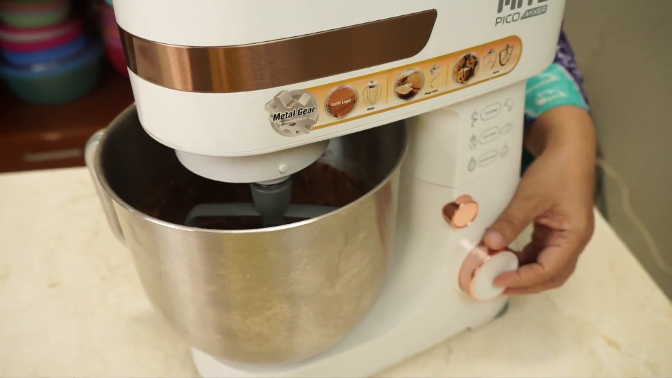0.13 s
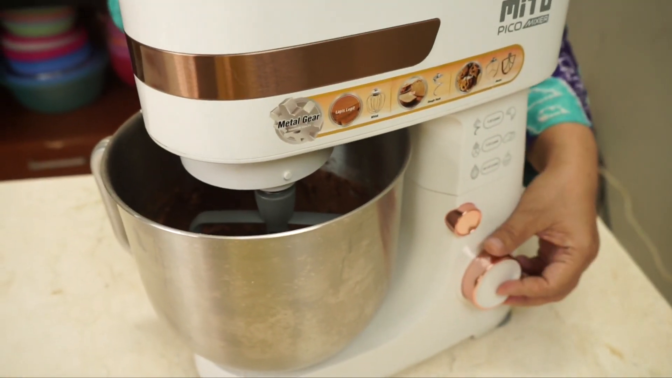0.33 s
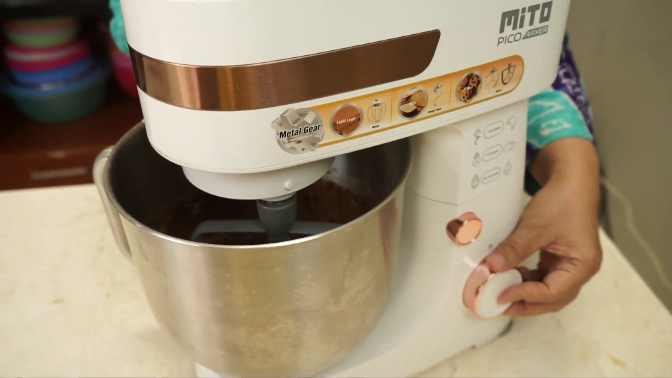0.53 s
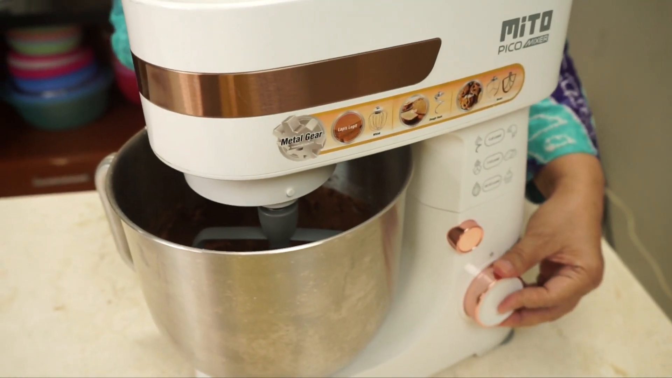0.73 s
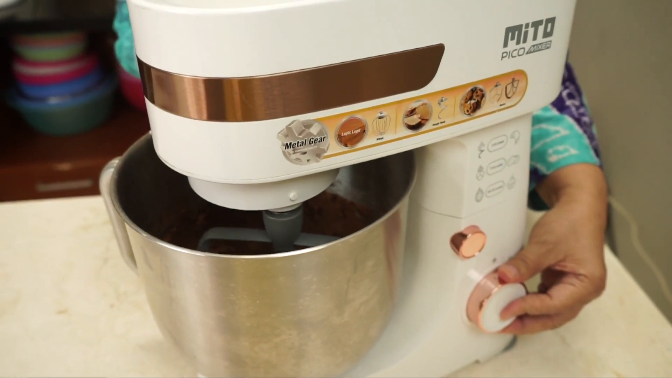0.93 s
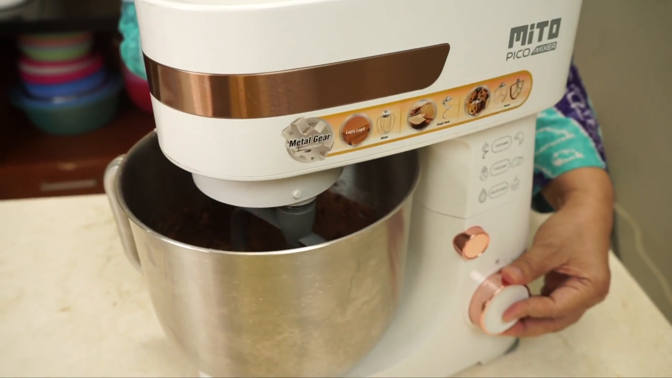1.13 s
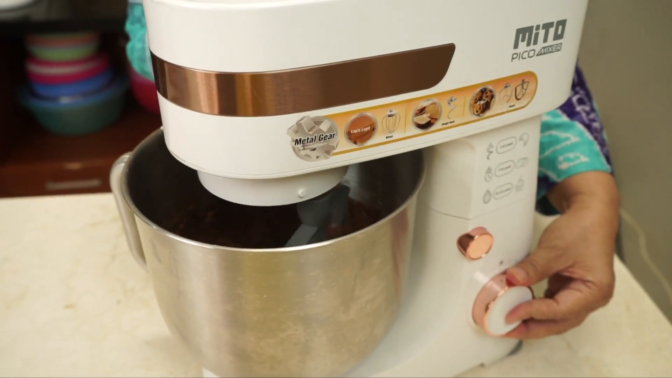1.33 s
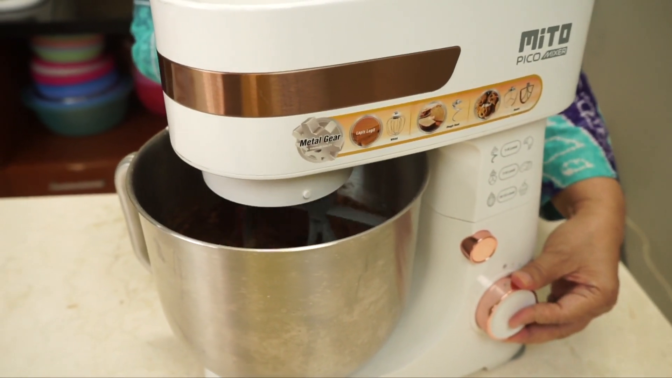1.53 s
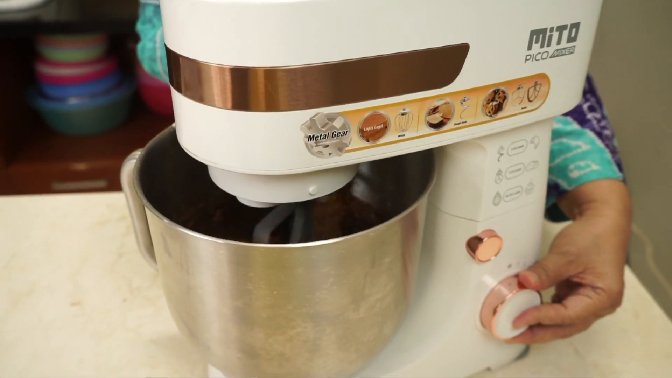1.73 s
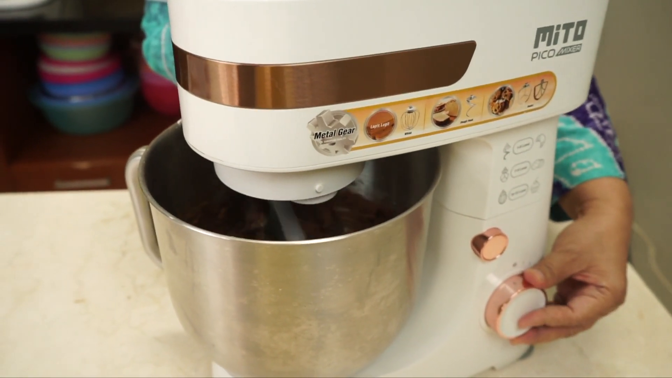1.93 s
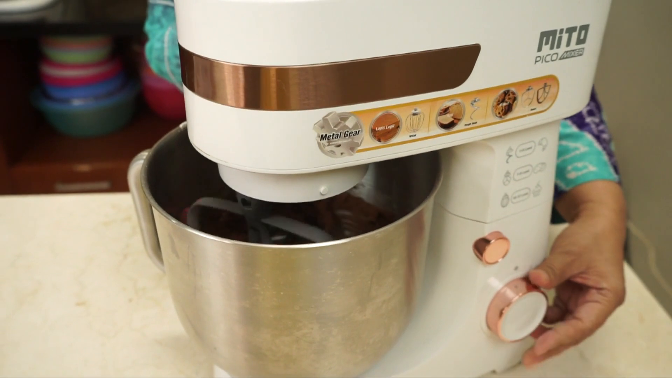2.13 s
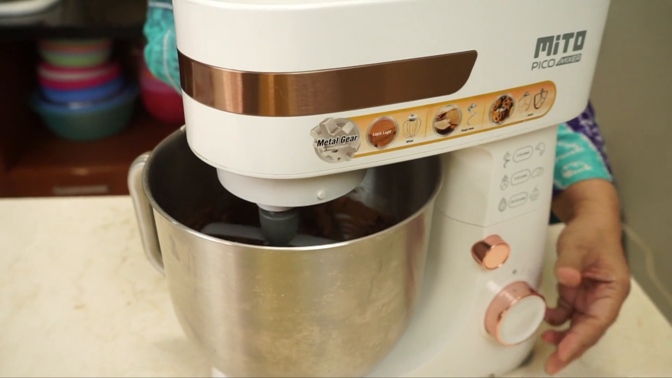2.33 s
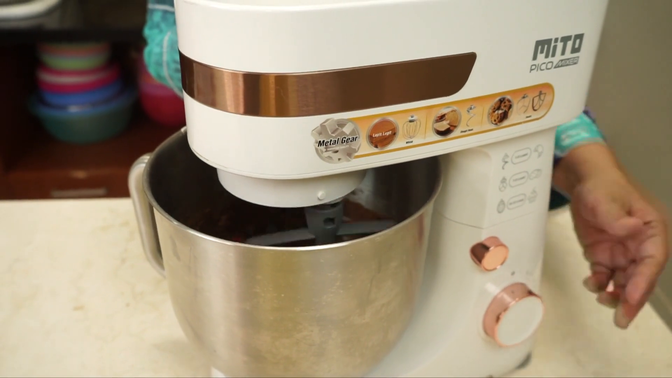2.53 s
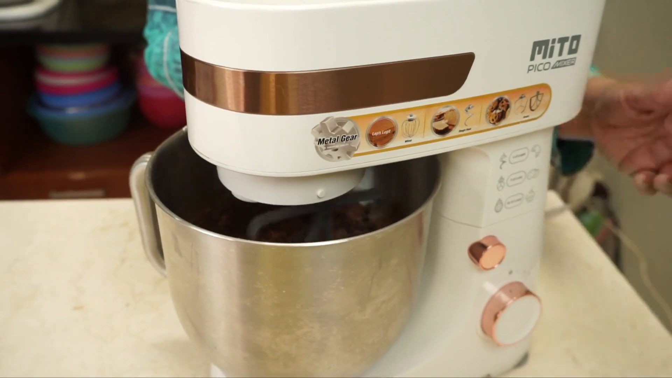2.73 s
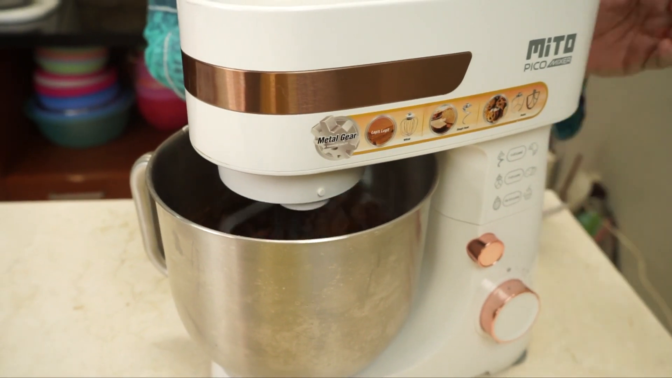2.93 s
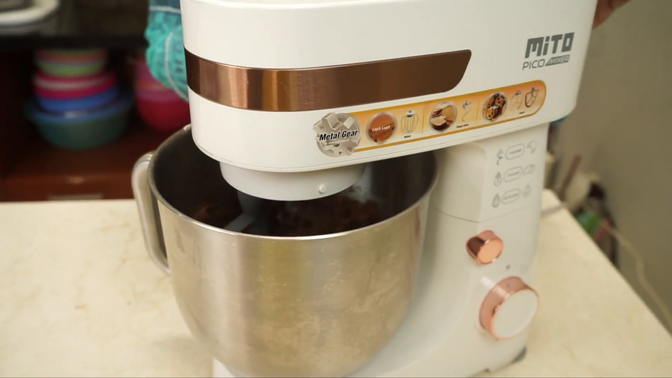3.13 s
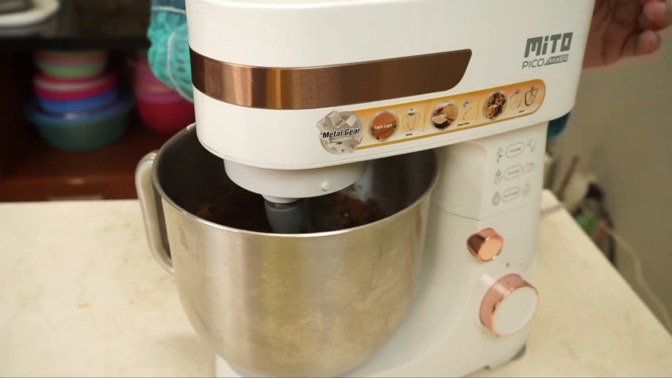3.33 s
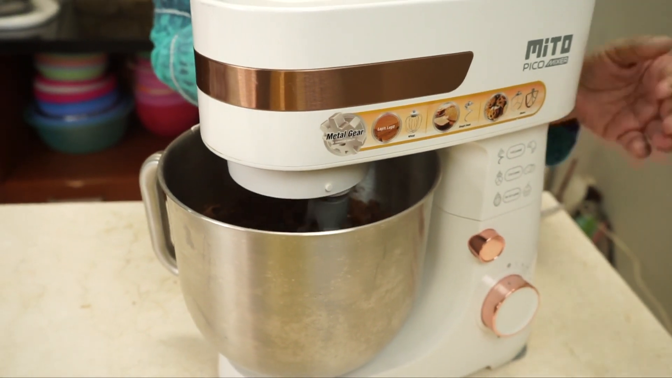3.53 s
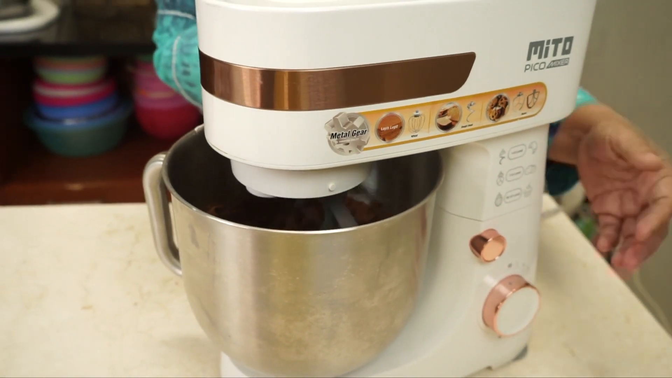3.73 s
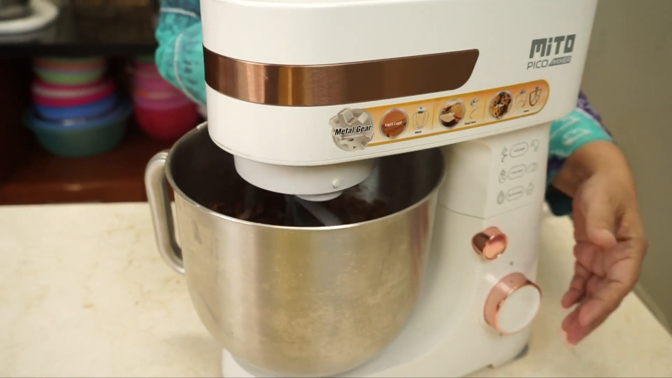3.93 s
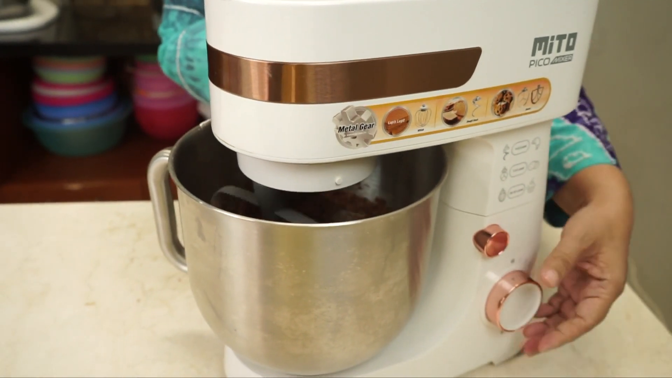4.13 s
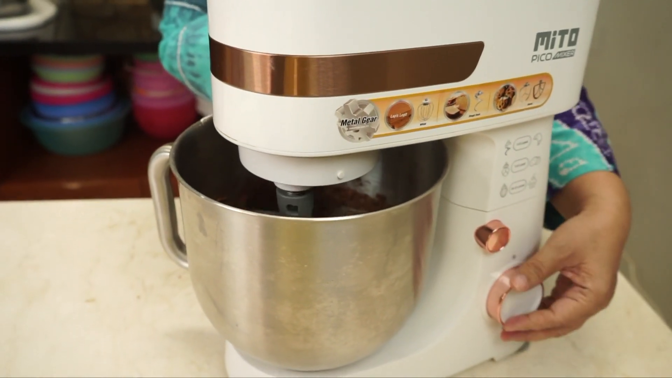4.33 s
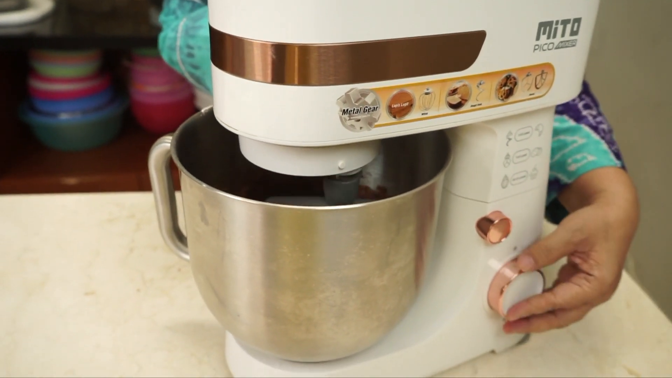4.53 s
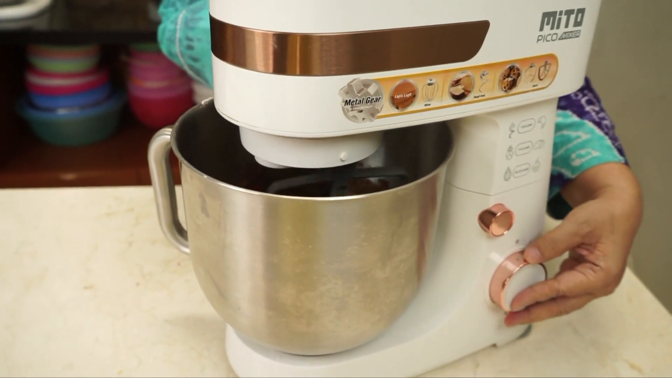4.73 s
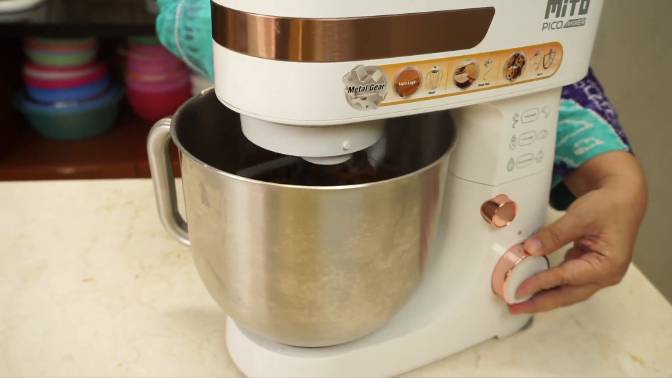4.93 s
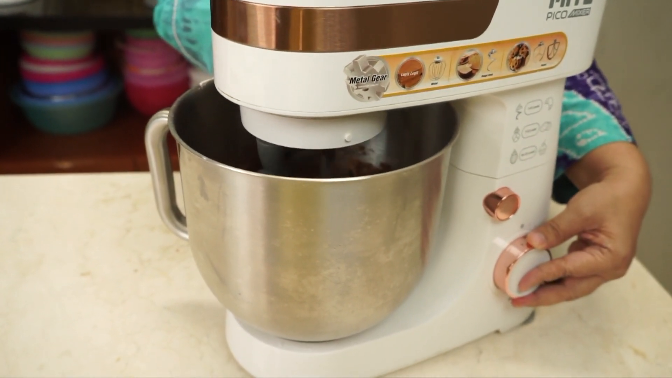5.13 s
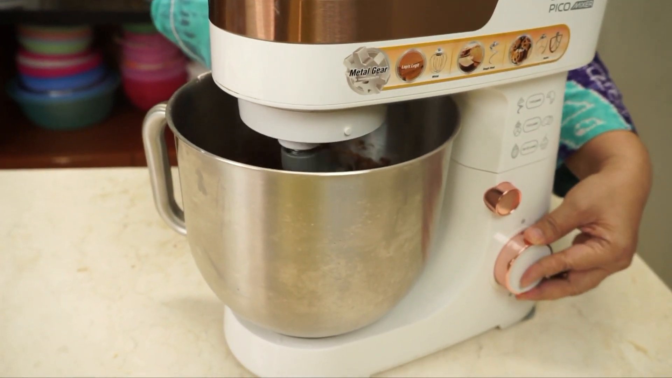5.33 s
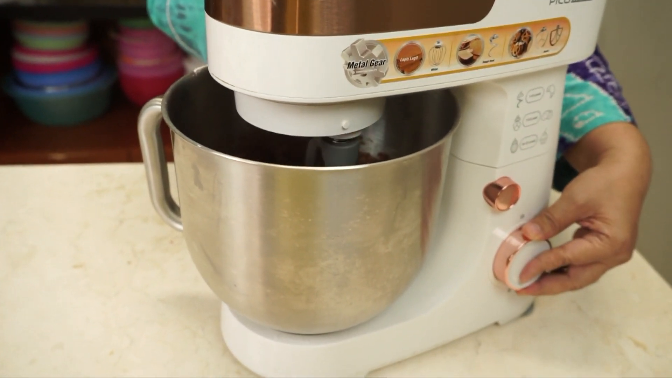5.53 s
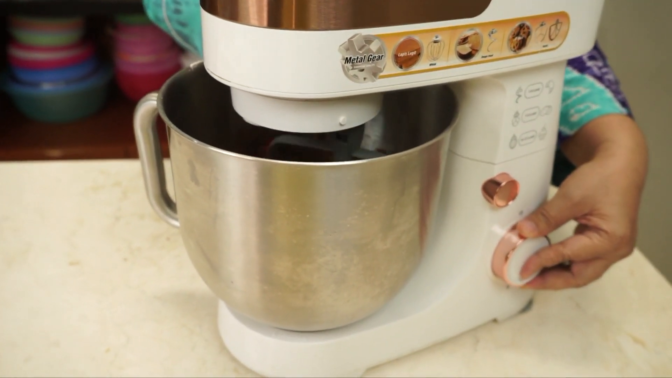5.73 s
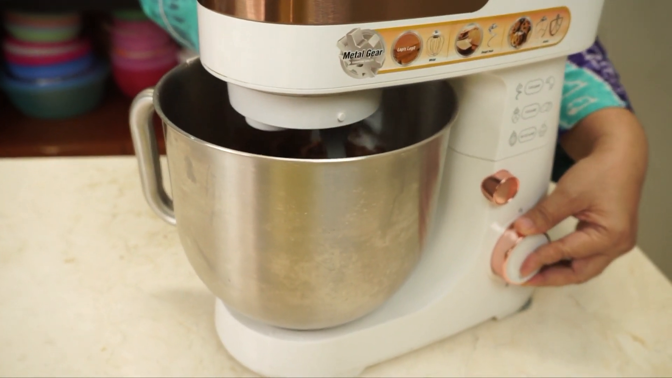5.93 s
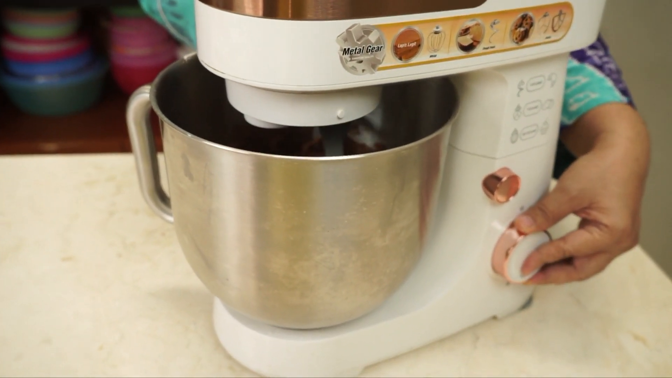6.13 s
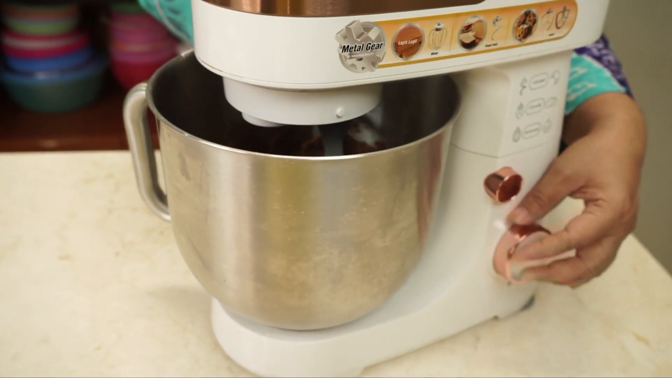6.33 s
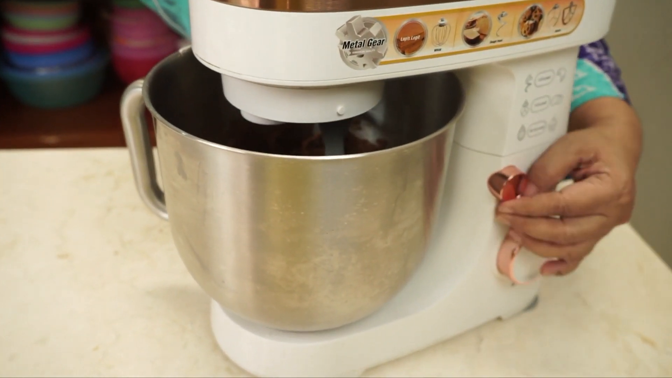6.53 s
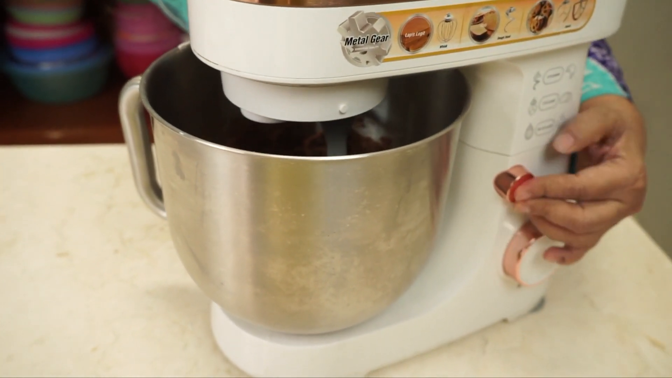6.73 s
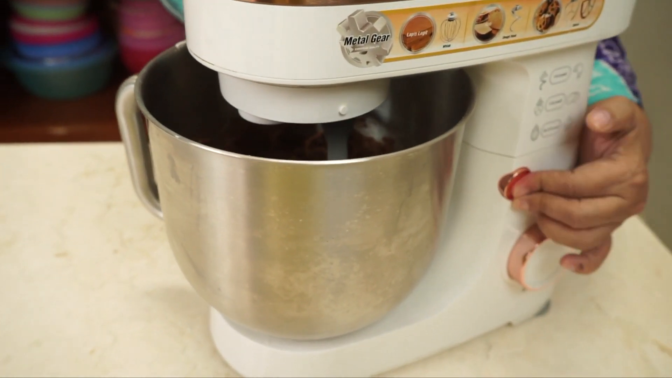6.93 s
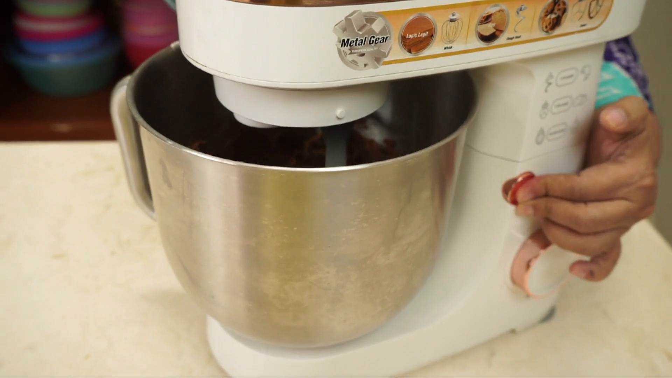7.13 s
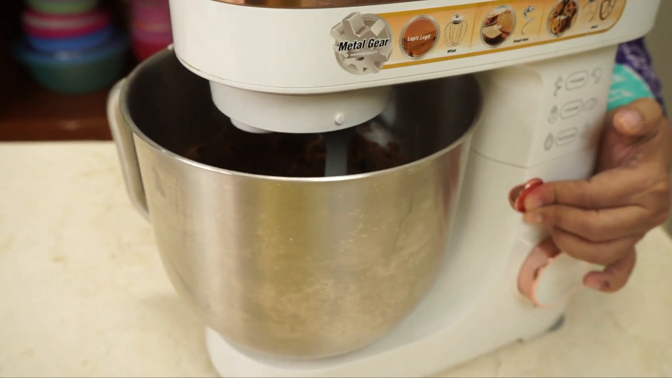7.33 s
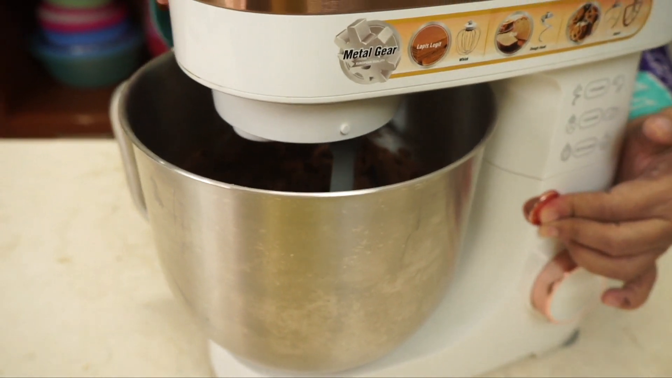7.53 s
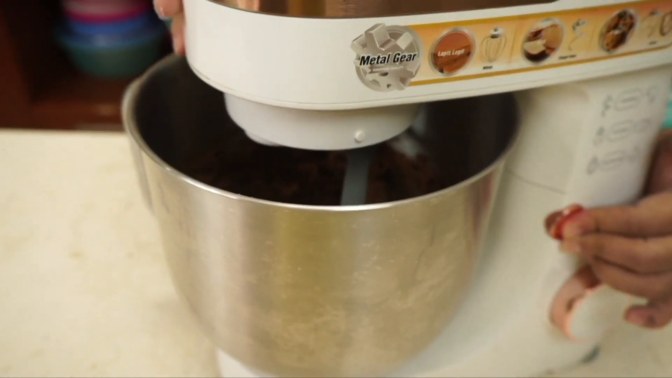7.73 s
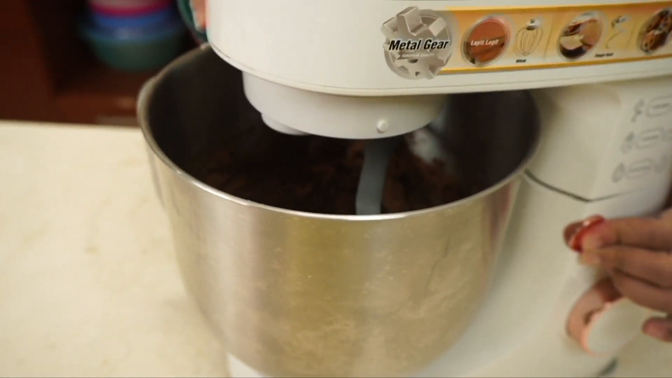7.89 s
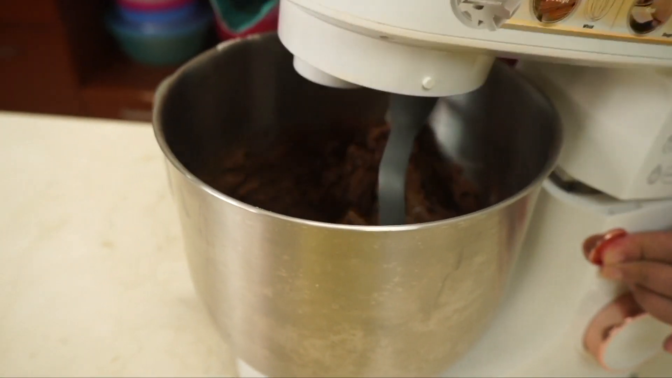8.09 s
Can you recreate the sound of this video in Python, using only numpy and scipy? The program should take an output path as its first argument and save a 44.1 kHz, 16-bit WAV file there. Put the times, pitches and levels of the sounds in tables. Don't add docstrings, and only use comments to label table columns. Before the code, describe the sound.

Low nudges and dull clicks come first over soft fridge and street rumble. A mixer motor then stutters, growls and rises to a steady grinding whine, wavering about twice or three times a second under thick dough, with brush hiss and metallic knocks. It gradually eases, drops in pitch and stops. Light control clicks, a thin distant bird, sleeve rustle and a hard latch clack follow, heard close in a lightly reverberant kitchen.

```python
import sys
import numpy as np
from scipy import signal
from scipy.fft import rfft, irfft
from scipy.io import wavfile
from scipy.ndimage import uniform_filter1d

SR = 44100
rng = np.random.default_rng(int(sys.argv[2]) if len(sys.argv) > 2 else 0)


def put_to_file(sound):
    columns = np.atleast_2d(sound).T
    safe = np.clip(columns, -1, 1)
    whole_steps = np.round(safe * 32767)
    wavfile.write(sys.argv[1], SR, whole_steps.astype(np.int16))


def voltage_ratio(level):
    return 10 ** (np.asarray(level, float) / 20)


N = 359856

# [f/Hz, level/dB per Hz]
AIR_SPECTRUM = [(15, -54.5), (25, -25), (133, -4), (165, -7.5), (194, 0.5), (228, -12.5), (276, -0.5),
                (392, -15.5), (636, -9.5), (748, -20), (811, -16.5), (1870, -29), (3040, -32),
                (3480, -34.5), (15800, -57.5)]
# [t/s, level/dB]
AIR_LEVEL = [(0.0, -47), (0.86, -47), (2.2, -45), (3.66, -50.5), (5.61, -55.5), (6.34, -53.5), (6.98, -52),
             (7.43, -52.5), (8.16, -49.5)]
# [t/s, half length/s, level over the hiss/dB]
RUSTLES = [
    (.45, 0.12, 7),
    (7.3, 0.69, 10),
]
AIR_LIFT_DB, MIC_HISS_DB = 18, -13

# [t/s, length/s, f/Hz, level/dB]
BIRD_NOTES = [
    (6.595, .2, 3120, -49.5),
]

# [f/Hz, t60/s]
KITCHEN_DECAY = [(100, .3), (1000, .3), (8000, .2)]

# [t/s, peak level/dB, f/Hz]
NUDGES = [
    (0.323, -22.5, 312),
    (0.427, -10, 139),
    (0.532, -12, 180),
    (0.567, -12.5, 192),
    (0.593, -16.5, 160),
    (0.704, -18, 208),
]
# [t/s, length/s, level/dB, low rumble level/dB]
RUBS = [
    (0, 0.15, -39.5, -30),
    (2.391, 0.18, -22.5, -42),
    (7.305, 0.12, -62, -31.5),
    (7.766, 0.2, -37.5, -26.5),
]
# [t/s, snap peak level/dB, thud peak level/dB, ring of the struck part f/Hz, ring t60/s]
CLICKS = [(0.3946, -29, -31, 280, 0.083), (0.7921, -21.5, -25, 255, 0.048), (0.8364, -33, -15, 432, 0.13),
          (0.8824, -40, -42, 432, 0.045), (0.9389, -30, -9.5, 467, 0.11),
          (6.3034, -34.5, -28.5, 239, 0.066), (6.4312, -22.5, -26, 524, 0.13),
          (6.4546, -33, -30, 484, 0.07), (6.9382, -15.5, -18, 562, 0.12), (6.9644, -26, -23.5, 476, 0.07),
          (7.7581, 2.5, -5, 457, 0.1), (7.7909, -14, -17, 434, 0.053), (7.8424, -29, -13, 820, 0.04),
          (7.8548, -26, -23, 300, 0.052)]
# [t/s, peak level/dB, body level relative to peak/dB]
KNOCKS = [(1.056, -26, 3), (1.2202, -23, -1), (1.257, -19, -15), (1.4485, -20, -12), (1.584, -3, -11),
          (1.6968, -8, -15.5), (1.7432, -4.5, -5), (1.8186, -14, -12), (2.016, -1.5, -4.5),
          (2.1107, -11.5, -1), (2.356, -14, -0.5), (2.3754, 6.5, -7), (2.4127, -3.5, -10),
          (2.682, -8.5, -6), (2.787, -11, -10), (2.9752, -11, -15), (3.116, -13.5, -3), (3.2892, -10, 4),
          (3.5605, -17, -17), (3.6915, -20, 0), (3.9862, -13.5, 1), (4.231, -17.5, 1), (4.4888, -15.5, -21),
          (4.5868, -16.5, -21), (4.892, -13, 6), (5.2192, -18, -16), (5.451, -18.5, -9), (5.5184, -15, -11),
          (5.6398, -16.5, -9), (5.8114, -12.5, -15)]
# [f/Hz, level/dB]
SHELL_MODES = [(240, 2), (312, 2.5), (425, 8), (650, -3), (850, -7), (1150, -17), (1550, -16.5)]
# [f/Hz, level/dB per Hz]
SNAP_SPECTRUM = [(530, -12), (900, 7), (1290, -5.5), (2050, 2), (2450, -7.5), (2960, -2), (4940, -16.5),
                 (7320, -25.5), (8050, -28.5), (15500, -48.5)]

# [multiple of mains, level/dB]
HUM_HARMONICS = [(1, -16.5), (2, -37.5), (3, -5), (4, 2.5), (5, -2.5), (6, -5.5), (9, 0)]
MAINS_HZ = 50.05
HUM_FULL_DB, HUM_TORQUE, HUM_SPEED = -28, 1, -0.75

# [t/s, torque level including the slow fall from gain control/dB, rotor speed relative to full
MOTOR = [(0.8, -30, 0.2), (0.84, -30, 0.2), (0.88, -21, 0.06), (1.1, -17, 0.19), (1.14, -17.5, 0.37),
         (1.22, -14.5, 0.43), (1.3, -14.5, 0.83), (1.5, -16.5, 0.8), (2.05, -13.5, 1.05), (2.6, -15, 1.05),
         (3.5, -17, 1.01), (4.3, -19, 0.93), (5.1, -19.5, 0.96), (5.5, -19.5, 0.81), (5.75, -22, 0.8),
         (5.89, -25, 0.52), (5.97, -34, 0.24), (6.08, -46, 0.22)]
# [f/Hz, width/Hz, level/dB]
HOUSING_MODES = [(226, 40, -4), (289.9, 73, -3.5), (400, 51, -9.5), (510.5, 57, -2.5), (612, 133, -11)]
# [f/Hz, width/Hz, level/dB]
BASE_MODE = [(445, 42, 0)]
# [f/Hz, width/Hz, level/dB]
PANEL_MODES = [(761, 140, 6), (821.4, 50, 9), (938.5, 90, 8), (1129, 450, -5), (1413, 270, -3.5),
               (1582, 95, 2.5), (1711, 140, -0.5), (1886, 150, -5), (2110, 310, -9), (2385, 130, -6.5),
               (2960, 1800, -16.5)]
# [f/Hz, width/Hz, level/dB]
BRUSH_MODES = [(3320, 170, -5), (3910, 230, -2), (4803, 610, 5), (5760, 430, -21.5), (6645, 620, 4),
               (8000, 4800, -18), (9000, 200, -13), (9800, 200, -15), (11500, 250, -17),
               (13000, 3000, -30.5), (14400, 350, -26)]
FULL_TORQUE_DB = -16
BUZZ_DB, BUZZ_TORQUE, BUZZ_SPEED = -21.5, 0.6, 0.97
HISS_DB, HISS_TORQUE, HISS_SPEED = -39, 0.18, 1.95
BASE_DB, BASE_TORQUE = -26, 0.9
KICK_S, KICK_DB = 0.041, 49
SLOW_S, SLOW_LENGTH_S, SLOW_DB = 1.35, 0.45, 8
COG_S, COG_PER_S, COG_FADE_S, COG_DB = 0.845, 19, 0.35, 5

# [t/s, length/s, f/Hz, peak level/dB]
SHUDDERS = [
    (5.855, 0.047, 820, -17),
    (2.1, 0.16, 515, -25),
    (1.89, 0.17, 515, -17.5),
    (1.29, 0.05, 780, -10),
    (1.58, 0.067, 975, -18),
]
# [f/Hz, width/Hz, level/dB]
HEAD_RADIATION = [(636, 37, -13), (831, 12.5, 0.5), (1053, 120, -14.5)]
# [t/s, tooth rate f/Hz, whine level/dB]
GEAR_SPEED = [(1.2, 400, -29), (1.33, 393.6, -27), (1.45, 413, -15.5), (1.61, 485.8, -12),
              (1.8, 540, -14.5), (1.88, 690, -19), (1.95, 716, -13.5), (2.13, 714, -16),
              (2.33, 884.4, -9.5), (3.0, 889.7, -10.5), (4.0, 870.8, -13), (5.15, 876.2, -15),
              (5.4, 871, -16), (5.5, 746.6, -21), (5.69, 555, -27), (5.76, 510, -27), (5.84, 434, -20),
              (5.98, 400, -38)]
# [t/s, lost share of speed, half length/s]
BITES = [
    (2.46, .14, .08),
    (2.82, .11, .08),
    (3.15, 0.042, .07),
    (3.43, .11, .11),
    (3.78, 0.069, 0.096),
    (4.06, 0.068, 0.058),
    (4.35, .12, .1),
    (4.655, 0.08, 0.052),
    (4.99, .1, .05),
    (5.26, .11, 0.059),
]
# [t/s, level/dB, half length/s]
GRINDS = [
    (1.33, 18, .08),
    (1.48, 12, 0.07),
    (3.24, 6, .1),
    (4.75, 5, 0.09),
    (5.2, 2, 0.21),
]
BITE_WHINE_DB, BITE_OCTAVE_DB, BITE_DRONE_DB, BITE_BASE_DB = -39, -9.5, -17.5, -69
OCTAVE_DB = -13
BURST_DB, LURCH = 2.0, 0.012


def evened(x):
    return x / np.sqrt(np.mean(x ** 2) + 1e-20)


def read(points, hz):
    f, value = np.transpose(points)
    return np.interp(np.log(hz + 1), np.log(f + 1), value)


def curves(rows):
    s, *columns = np.transpose(rows)
    t = np.arange(N) / SR
    gate = np.clip(np.minimum(t - s[0], s[-1] - t) / 0.057, 0, 1)
    return gate, [np.interp(t, s, column) for column in columns]


def bumps(rows, late=0.0):
    t = np.arange(N) / SR - late
    return sum(height * np.exp(-((t - s) / half) ** 2) for s, height, half in rows)


def add(mix, s, sound):
    part = mix[round(s * SR):][:len(sound)]
    part += sound[:len(part)]


def wander(hz):
    width = int(SR / hz / 2)
    smooth = uniform_filter1d(rng.standard_normal(N), width)
    return evened(uniform_filter1d(smooth, width))


def coloured(points, size):
    hz = np.fft.rfftfreq(size, 1 / SR)
    spectrum = rfft(rng.standard_normal(size)) * voltage_ratio(read(points, hz))
    return evened(irfft(spectrum, size))


def ring(x, modes):
    hz = np.fft.rfftfreq(16384, 1 / SR)
    each = np.array([voltage_ratio(db) / (1 + 2j * (hz - f) / width) ** 1.8 for f, width, db in modes])
    shape = np.linalg.norm(each, axis=0) * np.exp(1j * np.angle(each.sum(0)))
    centred = np.fft.fftshift(irfft(shape))
    return evened(signal.oaconvolve(x, centred, "same"))


def rattle(per_s, spread_db, flutter_db):
    size = voltage_ratio(spread_db * np.minimum(rng.exponential(1, N), 4))
    signed = size * rng.choice([-1.0, 1.0], N)
    return signed * (rng.random(N) < per_s / SR) * voltage_ratio(flutter_db * wander(45))


def room_air():
    _, (level_db,) = curves(AIR_LEVEL)
    rustle_db = bumps([(s, db, half) for s, half, db in RUSTLES])
    hiss_db = level_db + MIC_HISS_DB + rustle_db
    rumble = voltage_ratio(level_db + AIR_LIFT_DB + 1.0 * wander(21)) * coloured(AIR_SPECTRUM, N)
    hiss = coloured([(1500, -18.5), (4500, 5), (15000, -19.0)], N)
    return rumble + voltage_ratio(hiss_db) * hiss


def kitchen(x):
    taps = np.zeros(SR // 2)
    at = np.arange(300, len(taps) - 20, 20)
    taps[at + rng.integers(0, 20, len(at))] = rng.choice([-1.0, 1.0], len(at))
    hz, t, z = signal.stft(taps, SR, nperseg=256)
    decay = voltage_ratio(-60 * t / read(KITCHEN_DECAY, hz)[:, None])
    tail = signal.istft(z * decay, SR, nperseg=256)[1]
    return signal.fftconvolve(x, tail / np.linalg.norm(tail))[:N]


def bird():
    out = np.zeros(N)
    for s, length, hz, db in BIRD_NOTES:
        t = np.arange(int(length * SR)) / SR
        burr = 0.1 * np.cumsum(rng.standard_normal(len(t)))
        tone = np.sin(2 * np.pi * hz * t + burr)
        add(out, s, voltage_ratio(db - 60 * t) * tone * np.minimum(t / 0.008, 1))
    return out


def blow(snap_db, thud_db, struck_hz, t60, snap_t60):
    t = np.arange(8192) / SR
    fizz = voltage_ratio(-11.5 - 60 * t / 0.047)
    fade = (voltage_ratio(-60 * t / snap_t60) + fizz) * np.minimum(t / 0.00072, 1)
    snap = coloured(SNAP_SPECTRUM, len(t)) * fade
    snap *= np.linalg.norm(fade) / np.linalg.norm(snap) / 2
    modes = list(SHELL_MODES) + [(struck_hz, 4.0)]
    detune = rng.uniform(1.0, 1.04, len(modes))
    thud = sum(voltage_ratio(db - 60 * t / t60) * np.sin(2 * np.pi * hz * d * t) for (hz, db), d in zip(modes, detune))
    thud *= np.minimum(t / 0.0012, 1)
    return voltage_ratio(snap_db) * snap + voltage_ratio(thud_db) * thud / abs(thud).max()


def handling():
    out = np.zeros(N)
    for s, db, body_db in KNOCKS:
        add(out, s, blow(db, db + body_db, 900, 0.094, 0.022))
    for s, db, thud_db, hz, t60 in CLICKS:
        add(out, s, blow(db, thud_db + 6.0, hz, t60, 0.024))
    for s, length, db, low_db in RUBS:
        size = int(length * SR)
        grain = voltage_ratio(1.6 * wander(120)[:size]) * np.sin(np.pi * np.linspace(0, 1, size) ** 0.48)
        scrape = voltage_ratio(db) * coloured(SNAP_SPECTRUM, size)
        rumble = voltage_ratio(low_db) * coloured(AIR_SPECTRUM, size)
        add(out, s, grain * (scrape + rumble))
    t = np.arange(4000) / SR
    for s, db, hz in NUDGES:
        add(out, s, voltage_ratio(db - 60 * t / 0.05) * np.sin(2 * np.pi * hz * t) * np.minimum(t / 0.0013, 1))
    return out


def hum():
    gate, (torque_db, speed) = curves(MOTOR)
    speed_db = 20 * np.log10(np.maximum(speed, 0.45))
    level_db = HUM_FULL_DB + HUM_TORQUE * (torque_db - FULL_TORQUE_DB) + HUM_SPEED * speed_db
    t = np.arange(N) / SR
    lines = np.zeros(N)
    for multiple, db in HUM_HARMONICS:
        phase = 2 * np.pi * (multiple * MAINS_HZ * t + rng.random())
        lines += voltage_ratio(db + 2.0 * wander(3.0)) * np.sin(phase)
    return gate * voltage_ratio(level_db + 1.0) * lines


def motor():
    gate, (torque_db, speed) = curves(MOTOR)
    strain_db = torque_db - FULL_TORQUE_DB
    speed_db = 20 * np.log10(speed)
    bite = bumps(BITES)

    base_db = BASE_DB + BASE_TORQUE * strain_db + BITE_BASE_DB * bite + KICK_DB * bumps(BITES, KICK_S)
    base_db += bumps([(SLOW_S, SLOW_DB, SLOW_LENGTH_S)]) + 2 * BURST_DB * wander(18)
    since = np.maximum(np.arange(N) / SR - COG_S, -0.02)
    cogging = np.cos(2 * np.pi * COG_PER_S * since) - 1
    base_db += COG_DB * np.exp(-(since / COG_FADE_S) ** 2) * cogging

    jolts = rattle(1500, 3.3, 1.63)
    housing = voltage_ratio(torque_db - 3.0 + BITE_DRONE_DB * bite) * ring(jolts, HOUSING_MODES)
    base = voltage_ratio(base_db) * ring(jolts, BASE_MODE)

    shared = rattle(5000, 2.96, 1.4) * voltage_ratio(0.83 * wander(14))
    buzz_db = BUZZ_DB + BUZZ_TORQUE * strain_db + BUZZ_SPEED * speed_db
    hiss_db = HISS_DB + HISS_TORQUE * strain_db + HISS_SPEED * speed_db
    buzz = voltage_ratio(buzz_db) * ring(shared, PANEL_MODES)
    hiss = voltage_ratio(hiss_db) * ring(shared, BRUSH_MODES)
    return gate * (housing + base + buzz + hiss)


def shudder():
    out = np.zeros(N)
    for s, length, hz, db in SHUDDERS:
        t = np.arange(int(length * SR)) / SR
        add(out, s, voltage_ratio(db) * np.sin(2 * np.pi * hz * t) * np.sin(np.pi * t / length))
    return out


def radiated_db(hz):
    return sum(db * np.exp(-((hz - f) / width) ** 2) for f, width, db in HEAD_RADIATION)


def gears():
    gate, (free_hz, level_db) = curves(GEAR_SPEED)
    bite = bumps(BITES)
    hz = free_hz * (1 - bite + LURCH * wander(29.8))
    whine_db = level_db + BITE_WHINE_DB * bite + BURST_DB * wander(26)
    octave_db = level_db + OCTAVE_DB + BITE_OCTAVE_DB * bite
    octave_db += BURST_DB / 2 * wander(10) + bumps(GRINDS)

    loose = np.clip(800 / hz, 1, 1.6) ** 2
    turn = 2 * np.pi * np.cumsum(hz * (1 + 0.011 * loose * wander(70))) / SR
    runout = 1 + 0.35 * np.cos(turn / 19 + 1.5 * wander(12))
    whine = np.cos(turn + 0.5 * wander(70)) * (1 + 0.4 * wander(45)) * runout
    octave = np.cos(2 * turn + 0.9 * wander(90)) * (1 + 0.6 * wander(60)) * runout
    third = np.cos(3 * turn + 0.73 * wander(100)) * (1 + 0.8 * wander(36))
    second_pair = np.cos(2.2 * turn + 1.2 * wander(80)) * (1 + 0.8 * wander(30))

    upper = voltage_ratio(radiated_db(2 * hz)) * evened(octave)
    upper += voltage_ratio(-10.0) * evened(second_pair) + voltage_ratio(-19.5) * evened(third)
    lower = voltage_ratio(whine_db - 2.5 + radiated_db(hz)) * evened(whine)
    return gate * (lower + voltage_ratio(octave_db) * upper)


def scene():
    mixer = gears() + motor() + shudder()
    hits = handling() + bird()
    reflected = voltage_ratio(-14) * kitchen(mixer) + voltage_ratio(-12.5) * kitchen(hits)
    return (mixer + hum() + hits + reflected + room_air())[None]


def band_limit(x):
    return signal.sosfilt(signal.butter(12, 15920, fs=SR, output="sos"), x)


def record(dry):
    high_pass = signal.butter(N=1, Wn=150.0, btype="high", fs=SR, output="sos")
    thin = signal.sosfilt(high_pass, dry)
    fall = np.arange(N) * 160.0 / SR
    peak_db = 20 * np.log10(abs(thin[0]) + 1e-9)
    held_peak_db = np.maximum.accumulate(peak_db + fall) - fall
    over_db = np.maximum(held_peak_db - 1.0, 0)
    ducked = thin / voltage_ratio(signal.lfilter([0.02], [1, -0.98], over_db))
    limited = ducked / (1 + abs(ducked) ** 12) ** (1 / 12)
    return band_limit(limited)


dry = scene()
out = record(dry)
put_to_file(out)
```